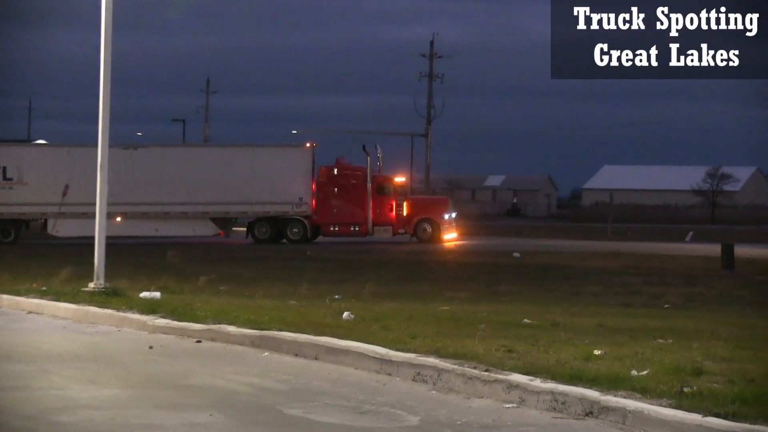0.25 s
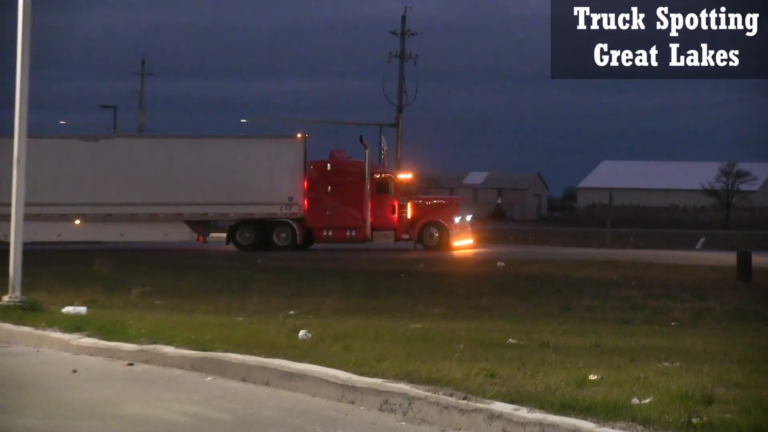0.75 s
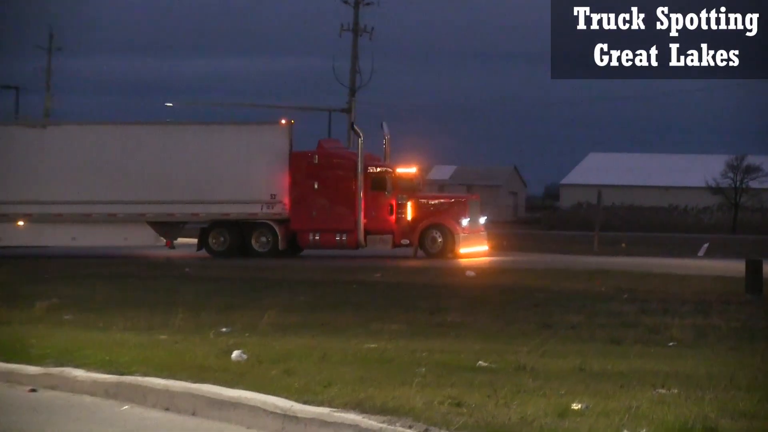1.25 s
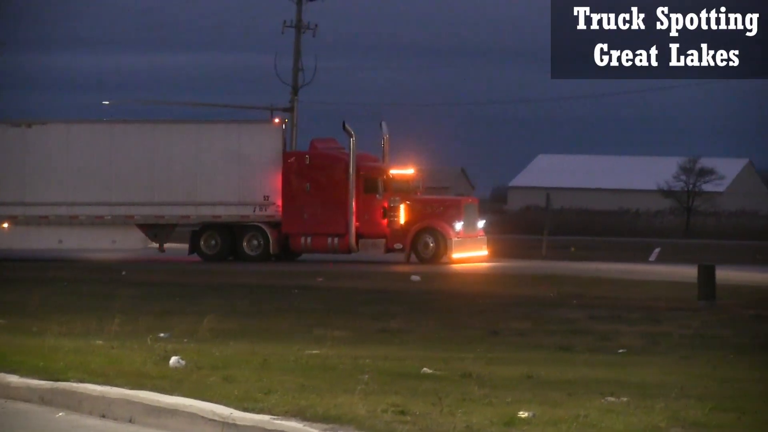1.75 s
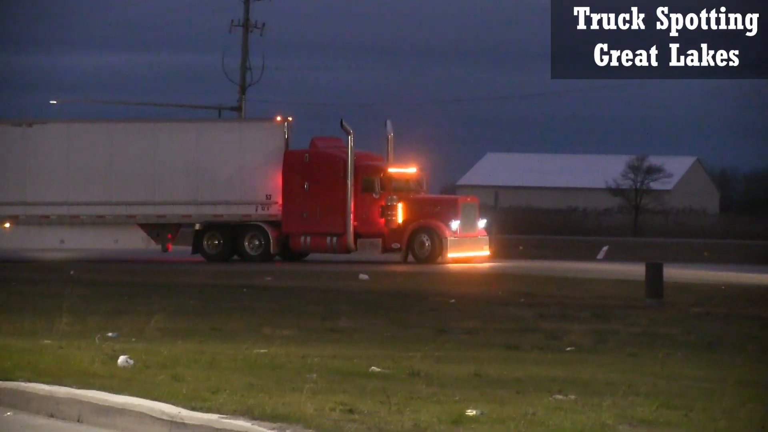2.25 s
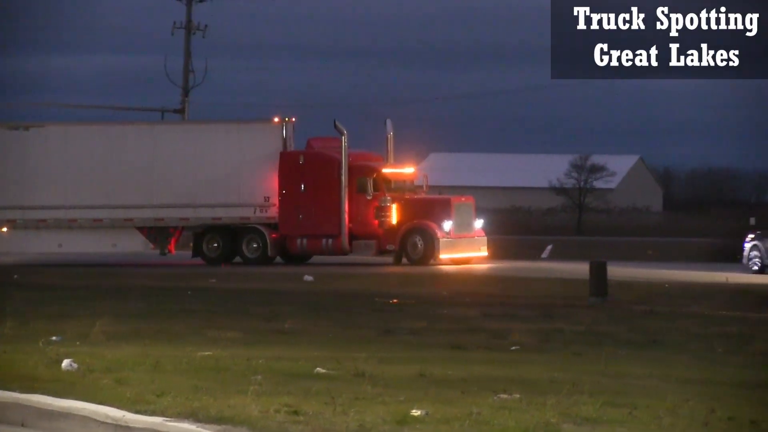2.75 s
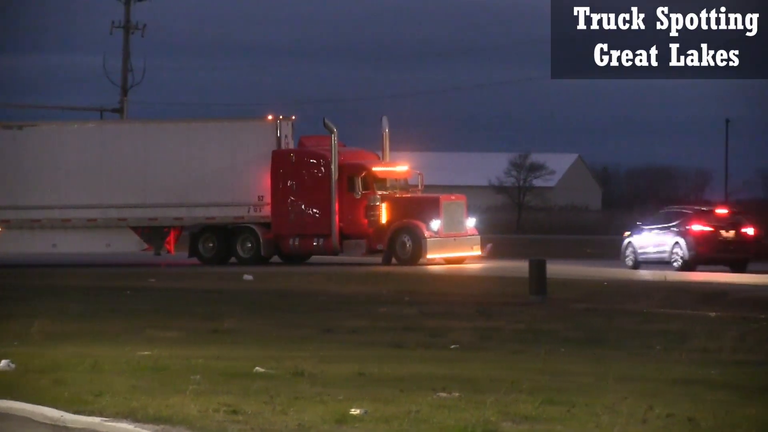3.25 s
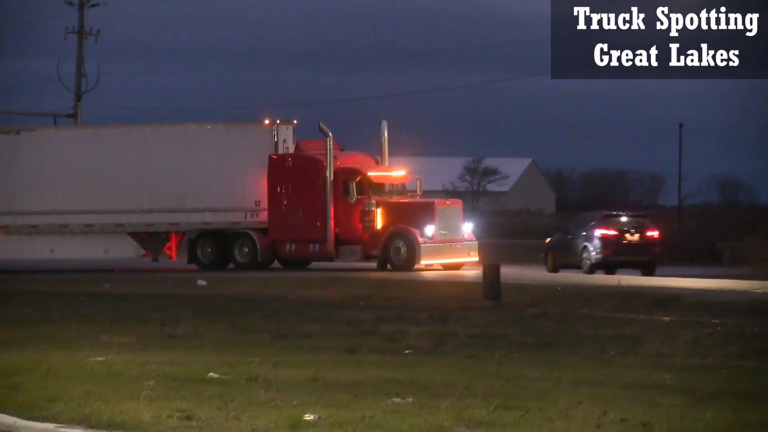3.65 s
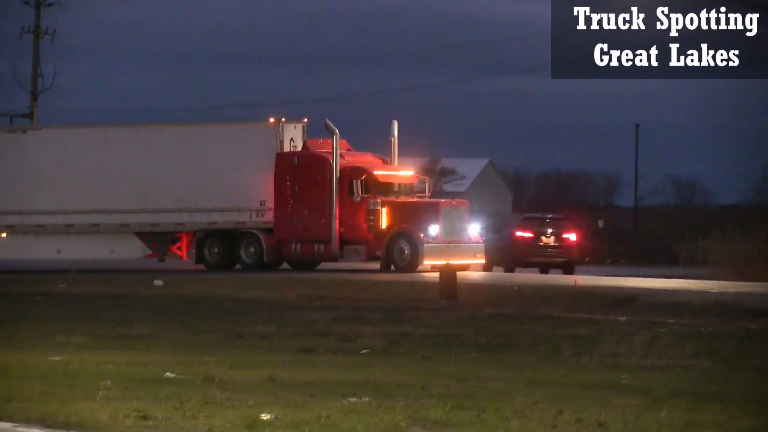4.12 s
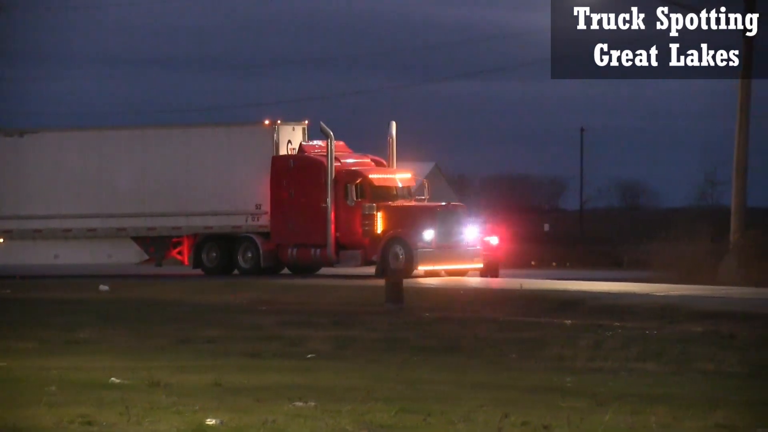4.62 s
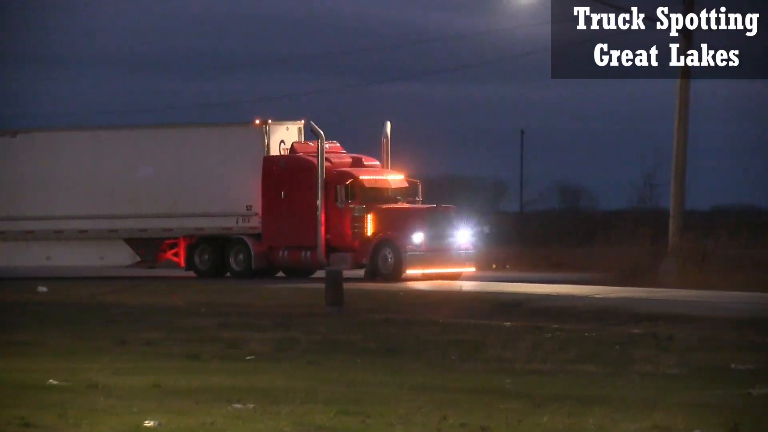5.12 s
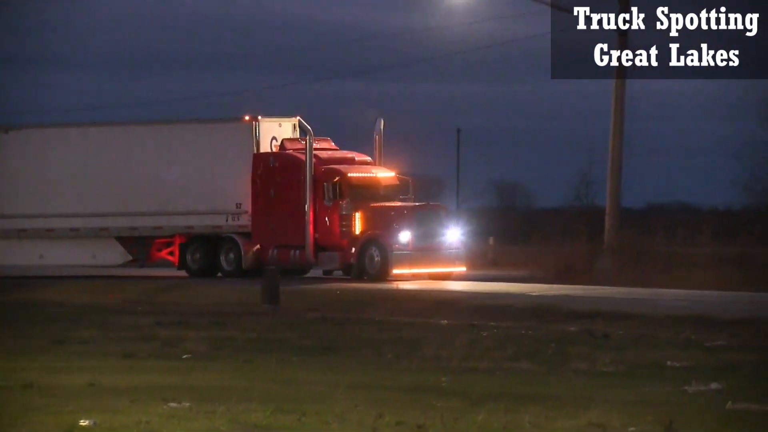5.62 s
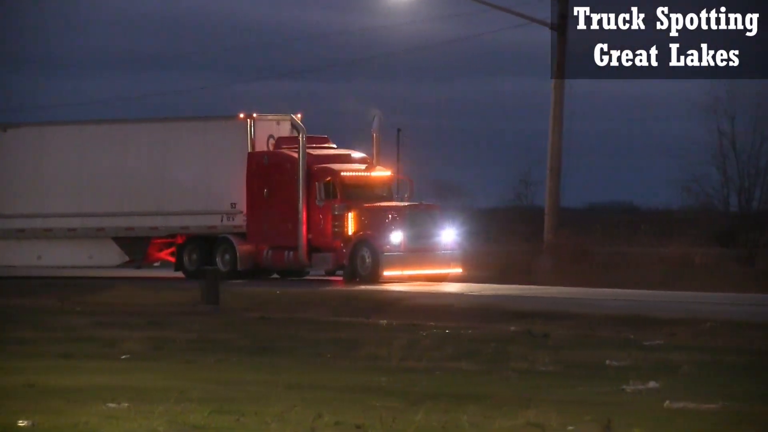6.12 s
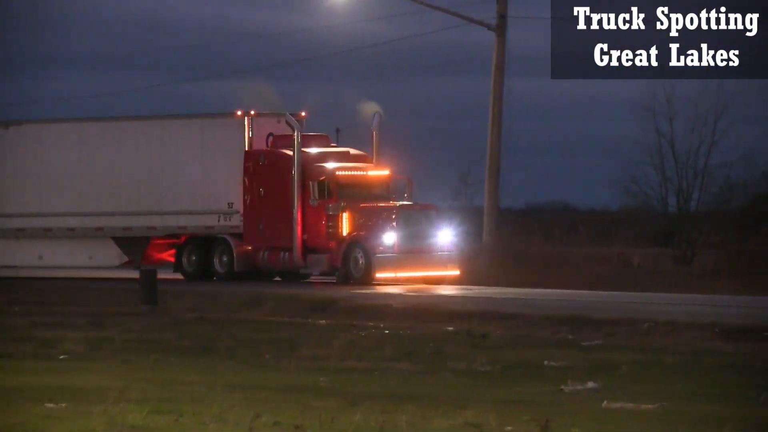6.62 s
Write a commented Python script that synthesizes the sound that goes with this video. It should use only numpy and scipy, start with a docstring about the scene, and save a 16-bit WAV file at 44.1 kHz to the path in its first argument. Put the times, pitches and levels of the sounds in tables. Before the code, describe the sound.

A big diesel truck with a loud, low exhaust accelerates along an open road. Its rough drone rises steadily for over three seconds, eases off, then a sharp puff of air and several heavy clunks mark a gear change. The note sags, quieter, then pulls up again. A car passes briefly with tyre roar. Outdoor stereo camera microphone from across grass.

```python
"""A six-cylinder diesel truck pulls away across a grass verge, changes gear with a puff of air and clunks, and pulls again.
Its exhaust is a set of wavering engine orders over a rough boom of weaker orders and noise puffs; pulsed noise
makes the block's clatter, ringing modes the clunks and shaped noise the valve's puff.
A car passes the other way: bands of noise for its tread and rough strands of tone for its whine.
Parked machinery hums nearby as steady tones; a two-port camera microphone hears it all outdoors."""
import sys
import numpy as np
from scipy import signal
from scipy.fft import rfft, irfft, next_fast_len
from scipy.io import wavfile
from scipy.ndimage import uniform_filter1d, minimum_filter1d

SR = 44100
rng = np.random.default_rng(int(sys.argv[2]) if len(sys.argv) > 2 else 0)


def wrap_up_sound(samples):
    """Save the sound to the file named by the first command line argument, as 16-bit audio."""
    columns = np.atleast_2d(samples).T
    # keep every value between -1 and 1, then stretch to whole-number steps
    tamed = np.clip(columns, -1, 1)
    steps = np.round(tamed * 32767).astype(np.int16)
    wavfile.write(sys.argv[1], SR, steps)


N = 302949
TIME = np.arange(N) / SR  # s


def gain_of(db):
    """Decibels to amplitude."""
    return 10 ** (np.asarray(db) / 20)


def evened(x):
    """Scales a sound to rms 1."""
    return x / np.sqrt(np.mean(x ** 2) + 1e-20)


def read(points, hz):
    """Reads a spectrum's value at hz, on a log axis."""
    point_hz, value = np.transpose(points)
    return np.interp(np.log(hz + 1), np.log(point_hz + 1), value)


def curves(rows):
    """Each column of a timed table at every sample."""
    time_s, *columns = np.transpose(rows)
    return [np.interp(TIME, time_s, column) for column in columns]


def filtered(x, gain):
    """Applies gain(hz) to a sound."""
    size = next_fast_len(N + 4096, True)
    hz = np.fft.rfftfreq(size, 1 / SR)
    return irfft(rfft(x, size) * gain(hz), size)[..., :N]


def bell(x, centre, width):
    """Gaussian of height 1; width is its standard deviation."""
    return np.exp(-.5 * ((x - centre) / width) ** 2)


def coloured(x, spectrum):
    """Shapes a sound by a spectrum, then scales it to rms 1."""
    return evened(filtered(x, lambda hz: gain_of(read(spectrum, hz))))


def drift(rate_hz):
    """Slow random wandering of about rms 1, with little movement faster than rate_hz."""
    count, slow_rate = 4096, 400  # points, points a second
    hz = np.fft.rfftfreq(count, 1 / slow_rate)
    slow = irfft(rfft(rng.standard_normal(count)) / (1 + (hz / rate_hz) ** 4))
    return np.interp(TIME, np.arange(count) / slow_rate, evened(slow))


# likeness of the air noise at the two microphone ports: pitch_hz, correlation
PORT_LIKENESS = [(30, 0.85), (100, 0.97), (300, 1), (450, 0.95), (650, 0.75), (1000, 0.7), (1600, 0.81),
                 (2600, 0.74), (5000, 0.55)]


def air():
    """White noise at two microphone ports: most alike around 300 Hz, a little less in the deepest bass, least in the treble."""
    def likeness(hz):
        return np.clip(read(PORT_LIKENESS, hz), -1, 1)

    a, b = rng.standard_normal((2, N))
    mid = filtered(a, lambda hz: np.sqrt((1 + likeness(hz)) / 2))
    side = filtered(b, lambda hz: np.sqrt((1 - likeness(hz)) / 2))
    return np.array([mid + side, mid - side])


# hum of machinery standing nearby: pitch_hz, early_level_db, late_level_db
IDLE_HUM = [(145.4, -37.5, -35), (178.8, -34.5, -41.5), (226, -30, -38.5), (246.3, -30, -32),
            (279, -34, -37), (354, -30.5, -43), (466, -34, -44), (1440, -43, -49)]


def idler(waver_db=2.0, wander_turns=0.091):
    """Steady, wavering tones of parked machinery; most fade between 2.5 and 4.5 s."""
    hum = np.zeros(N)
    for hz, early_db, late_db in IDLE_HUM:
        level_db = np.interp(TIME, [2.5, 4.5], [early_db, late_db]) + waver_db * drift(1.4)
        phase_turns = hz * TIME + wander_turns * drift(5)
        hum += gain_of(level_db) * np.cos(2 * np.pi * phase_turns)
    return np.sqrt(2) * hum


def tyre_fizz(db=-61, centre_hz=6400, width_hz=1100):
    """The passing car's tread adds a thin band of hiss until the truck hides it."""
    swell = np.interp(TIME, [3.3, 3.55, 3.8, 4.2], [0, 1, 1, 0])
    hiss = filtered(air(), lambda hz: bell(hz, centre_hz, width_hz))
    return gain_of(db) * swell * evened(hiss)


# rasping whine as the car goes by: time_s, pitch_hz, level_db
CAR_WHINE = [(3.45, 920, -55), (3.55, 905, -33.5), (3.68, 900, -38), (3.76, 965, -29), (3.82, 1040, -30.5),
             (3.92, 940, -36.5), (4.01, 895, -32), (4.07, 830, -44.5), (4.17, 850, -31), (4.25, 850, -64)]
# strands of that whine: pitch_factor, level_db
WHINE_STRANDS = [(.83, -9.5), (1, -2), (1.17, -13)]


def whine(rasp_hz=45):
    """Rough, broken strands of tone, likely the passing car's tread, come and go briefly with its pass."""
    pitch_hz, level_db = curves(CAR_WHINE)
    phase = 2 * np.pi * np.cumsum(pitch_hz) / SR
    strands = np.zeros(N)
    for factor, strand_db in WHINE_STRANDS:
        # two independent drifts make a tone into a narrow band of noise
        rasp = drift(rasp_hz) * np.cos(factor * phase) + drift(rasp_hz) * np.sin(factor * phase)
        strands += gain_of(strand_db) * rasp
    present = (TIME > CAR_WHINE[0][0]) * (TIME < CAR_WHINE[-1][0])
    return gain_of(level_db) * strands * present


# tyre roar of the truck and the passing car: loudest_s, spread_s, centre_hz, width_octaves, level_db
TYRE_PASSES = [(2.53, 0.59, 1350, 0.24, -28), (3.7, 0.25, 910, 0.26, -33), (4.08, .09, 880, 0.28, -28.5),
               (3.88, 0.74, 750, 0.48, -32.5)]


def tyres():
    """Tread roar, bands of noise that swell and fade as each vehicle goes by."""
    out = np.zeros((2, N))
    for loudest_s, spread_s, centre_hz, octaves, db in TYRE_PASSES:
        roar = filtered(air(), lambda hz: bell(np.log2((hz + 1) / centre_hz), 0, octaves))
        out += gain_of(db) * bell(TIME, loudest_s, spread_s) * evened(roar)
    return out


# small rattle of the trailer: start_s, level_db before its band is picked out
TRAILER_TICKS = [(0.26, -15.5)]


def ticks(centre_hz=2900, width_hz=750, decay_s=0.0041):
    """Loose steel fittings click: a quickly dying burst of noise in one band."""
    blows = np.zeros(N)
    for start_s, db in TRAILER_TICKS:
        blows += gain_of(db) * (TIME > start_s) * np.exp(-abs(TIME - start_s) / decay_s)
    return filtered(air() * blows, lambda hz: bell(hz, centre_hz, width_hz))


# clunks of the driveline and coupling: start_s, level_db, pitch_factor on the modes
DRIVELINE_CLUNKS = [(0.307, 1, .95), (3.847, -1, 1.05), (4.149, 2, 1.06), (4.186, 1.5, .85),
                    (4.251, 4.5, 1.03), (4.259, 4.5, .99), (4.291, -3.5, .88), (4.316, -5.5, .75),
                    (4.788, -8.5, 1.0)]
# modes the clunks ring with: pitch_hz, level_db, t60_s
FRAME_MODES = [(135, -9.5, 0.06), (186, -15.5, 0.3), (249.5, 2, 0.06), (367, -3.5, 0.04),
               (432, -10.5, 0.035), (560, -18.5, 0.03)]


def clunks(rise_s=0.0055):
    """Slack in the driveline is taken up: soft, heavy blows ring the frame."""
    out = np.zeros(N)
    for start_s, db, pitch in DRIVELINE_CLUNKS:
        start = round(start_s * SR)
        t = TIME[:min(SR // 2, N - start)]
        ring = np.zeros(len(t))
        for hz, mode_db, t60_s in FRAME_MODES:
            ring += gain_of(mode_db - 60 * t / t60_s) * np.sin(2 * np.pi * hz * pitch * t)
        soft_start = 1 - np.exp(-(t / rise_s) ** 2)
        out[start:start + len(t)] += gain_of(db) * ring * soft_start
    return out


# bands of the gear-change air jet: loudest_s, spread_s, centre_hz, width_hz, level_db
AIR_PUFF = [(4.158, 0.006, 850, 280, -19.5), (4.169, .011, 1400, 500, -29), (4.168, .008, 2370, 300, -22.5),
            (4.171, 0.0046, 3670, 160, -47), (4.170, .006, 4700, 210, -41), (4.169, 0.0094, 5540, 260, -43),
            (4.9, 0.0096, 7000, 330, -56), (4.174, 0.01, 8600, 300, -54.5)]


def shift_puff(opens_s=4.154, rise_s=.002):
    """The range valve of the gearbox spits air: a low pop, then a hiss coloured by the resonances of its port."""
    out, jet = np.zeros((2, N)), air()
    for loudest_s, spread_s, centre_hz, width_hz, db in AIR_PUFF:
        band = filtered(jet, lambda hz: bell(hz, centre_hz, width_hz))
        out += gain_of(db) * bell(TIME, loudest_s, spread_s) * evened(band)
    opening = np.clip((TIME - opens_s) / rise_s, 0, 1)
    return out * opening


# the truck swings from side-on to nose-on: start_s, end_s
SWING_TIMES = (3.72, 6.1)


def swing():
    """How far the nose has come round: 0 side-on, 1 nose-on."""
    return np.interp(TIME, SWING_TIMES, [0, 1])


def loaded(law, load_db):
    """A layer's level in dB, from the engine's load and the truck's heading."""
    base_db, db_per_load_db, turned_db = law
    return base_db + db_per_load_db * load_db + turned_db * swing()


# how hard each of the six cylinders fires, in firing order: level_db
CYLINDER_STRENGTH = [0.8, -0.5, 0.5, -2.5, 2, -3]


def firings(turns, decay):
    """A dying burst at each firing, decay in firings; every cylinder has its own strength."""
    cylinder = turns.astype(int) % len(CYLINDER_STRENGTH)
    strength = gain_of(CYLINDER_STRENGTH)[cylinder]
    return evened(strength * np.exp(-(turns % 1) / decay))


# turbo against effort: level_db at 0 dB load side-on, db_per_load_db, nose_on_gain_db
TURBO_LEVEL = (-59.5, 1.2, 7.1)


def turbo(load_db, centre_hz=4700, width_hz=130):
    """A thin, airy whistle, a narrow band of noise that comes up with the load."""
    whistle = filtered(air(), lambda hz: bell(hz, centre_hz, width_hz))
    return gain_of(loaded(TURBO_LEVEL, load_db)) * evened(whistle)


# relative spectra of block and intake noise: pitch_hz, level_db
CLATTER_SPECTRUM = [(250, -22), (500, 5), (800, -1.5), (1100, 1), (1500, 0), (1900, -5), (2550, -20),
                    (2800, -15), (3500, -38.5), (6000, -73.5), (14000, -80.5)]
HISS_SPECTRUM = [(1200, -9), (2200, 9.5), (2550, 5.5), (2780, 3.5), (3400, 0.5), (3680, 2), (3900, -4),
                 (4130, 2), (4430, -4), (4700, -3.5), (5200, -7), (6300, -12), (8000, -26), (14000, -47)]
# each against effort: level_db at 0 dB load side-on, db_per_load_db, nose_on_gain_db
CLATTER_LEVEL = (-26, 0.66, -1.2)
HISS_LEVEL = (-38.5, 0.88, 0.89)


def block(turns, load_db, steady=3.6, decay=.3):
    """Combustion knock and valve gear rattle in time with the firings, under the hiss of intake and stacks."""
    knock = coloured(air() * (steady + firings(turns, decay)), CLATTER_SPECTRUM)
    # the hiss pulses 0.4 of a firing ahead of the knock
    hiss = coloured(air() * (steady + firings(turns + .4, decay)), HISS_SPECTRUM)
    knock_db = loaded(CLATTER_LEVEL, load_db) + 0.96 * drift(12)
    hiss_db = loaded(HISS_LEVEL, load_db) + 0.83 * drift(20.0)
    return gain_of(knock_db) * knock + gain_of(hiss_db) * hiss


REFERENCE_HZ = 55.8  # firing rate from which engine speed is counted in octaves
# clean exhaust orders: multiple of the six-firing cycle rate, side_on_level_db, nose_on_level_db,
# before effort and stacks
CLEAN_ORDERS = [(6, -41.0, -31.5), (12, -28.5, -36.5), (14, -38.5, -21.0), (15, -43.5, -29.5),
                (16, -41, -48.5), (17, -55, -27.5), (18, -35, -18.5), (21, -54, -25), (22, -50.5, -30),
                (24, -46.5, -35.5), (26, -43.5, -33), (28, -46, -43), (30, -41, -30), (32, -40.5, -31),
                (33, -51, -34.5), (34, -42, -35), (36, -38.0, -31), (37, -40, -38.5), (38, -36, -38),
                (41, -40, -48), (42, -41.5, -39), (44, -45.5, -31.5), (48, -42, -44.0), (50, -49, -40.5)]
# relative spectrum of the exhaust boom: pitch_hz, level_db
BOOM_SPECTRUM = [(25, -34), (55, -24), (80, -16), (120, -7), (170, -5.5), (200, -1), (228, 1.5), (260, -3),
                 (310, 0), (370, -5.5), (450, -9.5), (620, -17.5), (900, -18.5), (1600, -72.5),
                 (6000, -94.5)]
# weaker orders that the firing sequence favours: multiple of the cycle rate: extra_db
FAVOURED_ORDERS = {8: 3.7, 9: 4}
# boom against effort: level_db at 0 dB load side-on, db_per_load_db, nose_on_gain_db
BOOM_LEVEL = (-13.5, 0.99, -1.9)
# how the boom changes as the truck swings its nose round: pitch_hz, change_db
BOOM_NOSE_ON = [(60, 0.5), (90, 0.5), (140, 0), (180, -7.5), (222, -5.5), (255, 0.5), (330, -1), (450, 2),
                (600, 0.5), (900, -15.5)]


def exhaust_boom(turns, firing_hz, load_db, orders_db=-8, puffs_db=-6.0, even_db=2, steady=0.66, count=64):
    """Unequal cylinders fill in lines a sixth of the firing rate apart; each firing also blows a turbulent puff."""
    cycles, cycle_hz = turns / 6, firing_hz / 6
    slow = slice(None, None, 64)
    lines = np.zeros(N)
    clean = [round(row[0]) for row in CLEAN_ORDERS]
    for k in np.setdiff1d(np.arange(8, count), clean):
        # even lines are whole turns of the crankshaft and stand out
        line_db = read(BOOM_SPECTRUM, k * cycle_hz[slow]) + even_db * (k % 2 == 0) + FAVOURED_ORDERS.get(k, 0)
        line_db = line_db + 2.5 * drift(2)[slow]
        level = np.interp(TIME, TIME[slow], gain_of(line_db))
        lines += level * np.cos(2 * np.pi * (k * cycles + rng.random()))
    puffs = coloured(air() * (steady + firings(turns, decay=0.36)), BOOM_SPECTRUM)
    # the puffs fall less than the lines as the load comes off
    puff_gain = gain_of(puffs_db - 0.4 * load_db)
    boom = gain_of(orders_db) * evened(lines) + puff_gain * puffs
    # the bass below about 190 Hz grows as the engine speeds up and as the load comes off
    deep = filtered(boom, lambda hz: 1 / (1 + (hz / 190) ** 6))
    bass_db = 3.5 + 11 * np.log2(firing_hz / REFERENCE_HZ) - 0.1 * load_db
    boom = gain_of(loaded(BOOM_LEVEL, load_db)) * (deep * gain_of(bass_db) + boom - deep)
    nose_on = filtered(boom, lambda hz: gain_of(read(BOOM_NOSE_ON, hz)))
    return (1 - swing()) * boom + swing() * nose_on


# resonances and notches of stacks and cab: centre_hz, width_hz, side_on_gain_db, nose_on_gain_db
STACK_PEAKS = [(64.2, 1.7, 10.5, 1.5), (85, 5, -12.5, -4), (109, 5.6, 0.5, -9), (122.77, 4.4, 18, -7.5),
               (149, 4.1, 9, -9), (156, 3.2, 13, -2), (168.1, 6.7, 11.5, 3.5), (178.2, 4, 14.5, -1.5),
               (184, 1.3, -10.5, 2.5), (190.8, 4.6, 19, -4), (224.7, 12, 26, -1), (245.5, 3.5, 8.5, 12),
               (259.7, 7.6, 14, 6.5), (275.4, 5.4, 16, 8), (293.5, 6.7, 15.5, -4.5),
               (316.8, 5.6, 12, -11.5), (335.6, 6.4, 12.5, 0), (356, 3.1, 6.5, -5)]


def stacks(hz, swung):
    """How many dB the stacks and cab add to a tone at hz, for the truck's heading."""
    return sum(((1 - swung) * side_db + swung * nose_db) * bell(hz, centre_hz, width_hz)
               for centre_hz, width_hz, side_db, nose_db in STACK_PEAKS)


def exhaust_note(turns, firing_hz, load_db, waver_db=1.37, flutter_db_per_khz=2.5, wander_per_khz=0.089):
    """Clean engine orders follow the effort and drone as they sweep through stack peaks; high ones flutter more."""
    slow = slice(None, None, 64)
    out, swung = np.zeros(N), swing()[slow]
    speed_octaves = np.log2(firing_hz / REFERENCE_HZ)
    effort_db = (0.1 + 0.71 * load_db + 6.5 * speed_octaves)[slow]
    # with the pedal up the firing-rate order loses its deep thud
    pedal_up = 1. * ((TIME > 3.86) & (TIME < 4.55))
    coast_db = -19.5 * uniform_filter1d(pedal_up, size=4410)[slow]
    for order, side_db, nose_db in CLEAN_ORDERS:
        per_firing = round(order) / len(CYLINDER_STRENGTH)
        hz = per_firing * firing_hz[slow]
        khz = hz.mean() / 1000
        db = effort_db + (1 - swung) * side_db + swung * nose_db + stacks(hz, swung)
        db = db + coast_db * (per_firing == 1)
        db = db + (waver_db + flutter_db_per_khz * khz) * drift(6.5)[slow]
        level = np.interp(TIME, TIME[slow], gain_of(db))
        phase_turns = per_firing * turns + wander_per_khz * khz * drift(6.7) + rng.random()
        out += np.sqrt(2) * level * np.cos(2 * np.pi * phase_turns)
    return out


# engine speed climbs, sags through the gear change and climbs again: time_s, firing_hz
ENGINE_SPEED = [(0, 44.3), (.55, 45.1), (.9, 47.6), (1.5, 52.1), (2.1, 56), (2.7, 60.1), (3.3, 63.1),
                (3.65, 64.5), (3.95, 60.1), (4.3, 52.2), (4.55, 49.4), (4.95, 46.5), (5.35, 48.1),
                (5.8, 52.4), (6.4, 57.1), (6.87, 61.9)]
# engine load: a full pull, easing off, the pedal lifted for the change, a second pull: time_s, load_db
ENGINE_LOAD = [(0, 0.6), (.5, -0.5), (1.3, 1.95), (2.55, 0.5), (3.1, -3), (3.8, -3.5), (4.2, -5),
               (4.35, -11), (4.9, -7.5), (5.3, -4.5), (6.6, 2.5), (6.87, 2.6)]


def scene():
    """Speed and load of one engine drive note, boom, clatter and turbo; the roadside sounds around them."""
    firing_hz, = curves(ENGINE_SPEED)
    load_db, = curves(ENGINE_LOAD)
    # running count of firings, with a slightly unsteady speed
    turns = np.cumsum(firing_hz * (1 + .002 * drift(8))) / SR
    roadside = idler() + tyre_fizz() + whine() + tyres()
    gear_change = clunks() + shift_puff()
    engine = turbo(load_db) + block(turns, load_db)
    exhaust = exhaust_boom(turns, firing_hz, load_db) + exhaust_note(turns, firing_hz, load_db)
    return roadside + ticks() + gear_change + engine + exhaust


# between the microphone ports: pitch_hz, left_minus_right_db
PORT_BALANCE = [(60, -0.5), (80, 4), (110, 0.5), (140, 0.5), (190, 0), (260, 0.5), (340, 1), (460, 1),
                (610, -2), (820, -3.5), (1090, -5), (1460, -2), (1950, 0), (2600, -2.5)]
# between the microphone ports: pitch_hz, left_lead_rad
PORT_LEAD = [(0, -0.058), (690, 0.086), (950, -1), (1460, 0.69), (1720, -1.1), (2150, -0.57), (2410, -1.4),
             (2760, -0.31)]


def record(dry, edge_hz=15200):
    """The two ports differ in colour and phase; a quick limiter holds peaks at full scale; then the band limit."""
    half = np.array([[.5], [-.5]])  # left, right

    def port_response(hz):
        return gain_of(half * read(PORT_BALANCE, hz)) * np.exp(1j * half * read(PORT_LEAD, hz))

    ports = filtered(dry, port_response)
    allowed = minimum_filter1d(1 / np.maximum(abs(ports).max(0), 1), size=441)
    limiter_gain = uniform_filter1d(uniform_filter1d(allowed, size=221), size=221)
    lowpass = signal.firwin(511, edge_hz, window=("kaiser", 9), fs=SR)
    return signal.oaconvolve(ports * limiter_gain, lowpass[None], "same")


dry = scene()
out = record(dry)
wrap_up_sound(out)
```